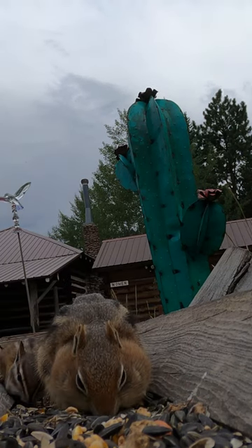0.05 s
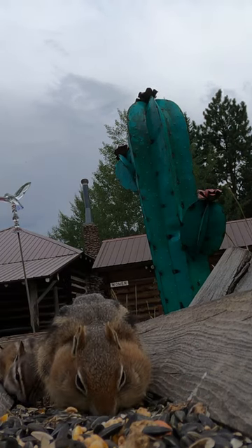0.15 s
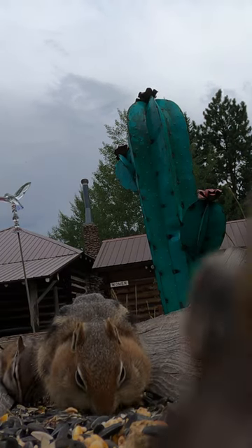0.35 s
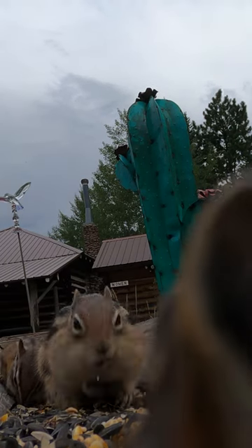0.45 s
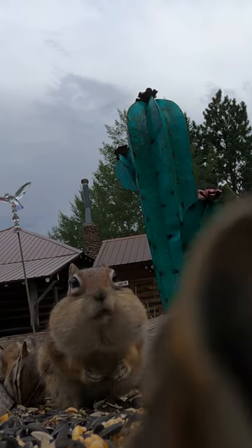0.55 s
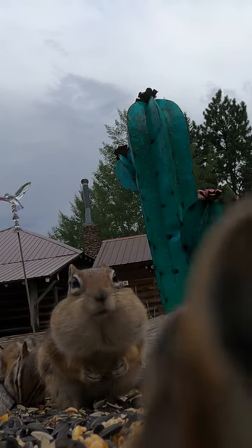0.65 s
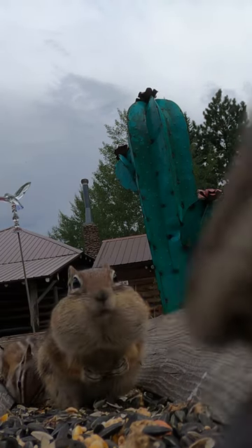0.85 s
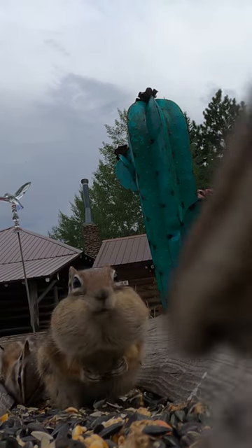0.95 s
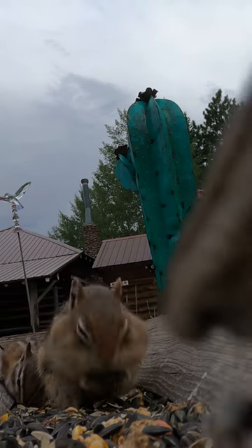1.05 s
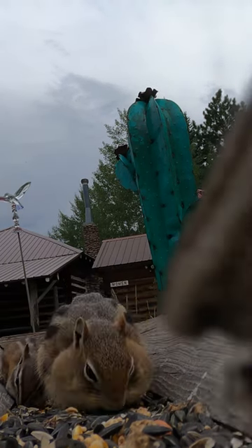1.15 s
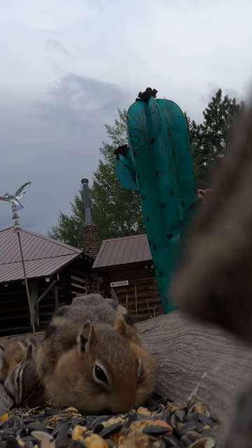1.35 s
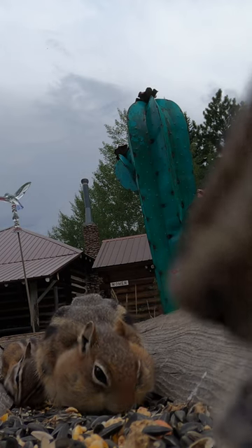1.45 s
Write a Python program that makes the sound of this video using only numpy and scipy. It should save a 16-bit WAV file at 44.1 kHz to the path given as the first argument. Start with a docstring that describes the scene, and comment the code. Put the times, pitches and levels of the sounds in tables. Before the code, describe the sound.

Chipmunks rummage through dry seeds very close, husks clicking and rustling, with soft bumps.

```python
"""Chipmunks in the sunflower seeds

Chipmunks rummage in a seed heap, centimetres from a phone lying outdoors. Husks slide in short
scuffs, snap, ping and ring as they are gnawed. One animal bumps the right microphone port and
brushes past it with its fur. Air rumbles on the ports over a quiet yard."""
import sys
import numpy as np
from scipy import signal
from scipy.fft import rfft, irfft, next_fast_len
from scipy.io import wavfile

SR = 44100
rng = np.random.default_rng(int(sys.argv[2]) if len(sys.argv) > 2 else 0)


def int16_out(signal):
    """Quantize to a 16-bit WAV file."""
    q = np.round(np.clip(np.atleast_2d(signal).T, -1, 1) * 32767)
    wavfile.write(sys.argv[1], SR, q.astype(np.int16))


N = 66150
HUSK_LIKENESS = 0.43  # how alike scuffs and snaps are at the two ports


def undb(db):
    """Decibels to gain."""
    return 10 ** (np.asarray(db) / 20)


def unit(x):
    """Scale to rms 1."""
    return x / np.sqrt(np.mean(x ** 2) + 1e-20)


def shape(x, response):
    """Filter by a response given as a function of frequency."""
    size = next_fast_len(x.shape[-1] + 4096)
    hz = np.fft.rfftfreq(size, 1 / SR) + 1e-3
    return irfft(rfft(x, size) * response(hz), size)[..., :x.shape[-1]]


def colour(x, points):
    """Minimum-phase EQ through (freq_hz, gain_db) points."""
    hz, db = np.array(points).T
    f = np.fft.rfftfreq(4096, 1 / SR) + 1
    gain = undb(np.interp(np.log(f), np.log(hz), db))
    cepstrum = irfft(np.log(gain))
    fold = 1 + np.sign(len(cepstrum) / 2 - np.arange(len(cepstrum)))
    fold[0] = 1
    impulse = irfft(np.exp(rfft(cepstrum * fold)))
    return signal.fftconvolve(x, impulse[None], axes=-1)[:, :N]


def resonate(x, hz, width_hz):
    """A resonance with gain 1 at its centre."""
    return shape(x, lambda f: 1 / (1 + 1j * (f / hz - hz / f) * hz / width_hz))


def noise(likeness, samples=N):
    """Stereo white noise, from unrelated sides (likeness 0) to mono (1)."""
    mid, side = rng.standard_normal((2, samples))
    return np.sqrt((1 + likeness) / 2) * mid + np.sqrt((1 - likeness) / 2) * side * np.array([[1], [-1]])


def pan(db):
    """Constant-power gains, the left db above the right."""
    return unit(undb(np.array([[db], [-db]]) / 2))


def yard():
    """A faint, steady outdoor hush."""
    # EQ of the hush: freq_hz, gain_db
    hush_eq = [(25, 0), (60, -5.5), (112, -13.5), (175, 6.5), (300, -6.5), (700, -15), (1100, -1),
               (1400, -4.5), (1900, -12.5), (2500, -13.5), (4000, -20), (6500, -25), (13000, -38),
               (16000, -50)]
    return unit(colour(noise(likeness=0.39), hush_eq)) * undb(-62.5) * pan(db=-1.5)


def air(t, left_db=-9):
    """Stirred air rumbles on the ports, most on the right."""
    # swells of air on the right port: time_s, level_db
    swells = [(0, -76), (.14, -70), (.19, -48.5), (.222, -38.5), (.335, -53.5), (.365, -43), (.42, -48.5),
              (.465, -44.5), (.5, -52.5), (.635, -54.5), (.69, -45), (.76, -46), (.86, -46.5), (.94, -55),
              (1, -58), (1.1, -68)]
    # EQ of the rumble: freq_hz, gain_db
    rumble_eq = [(15, -1), (35, -0.5), (90, -4), (160, -6), (260, -15.5), (500, -23), (1000, -32.5),
                 (4000, -55.5)]
    rumble = unit(colour(noise(likeness=0.89), rumble_eq))
    return rumble * undb(np.interp(t, *np.array(swells).T)) * undb([[left_db], [0]])


def scuffs(t, contacts_per_s=6000, scatter_db=5):
    """Sliding seeds make showers of tiny, uneven contacts; one short, low burst is the phone's knock."""
    # seed scuffs, plus a short 1.2 kHz knock of the phone's body at the first bump:
    # peak_s, rise_s, fall_s, pre_eq_level_db, centre_hz, pan_db
    bursts = [(.012, 0.031, 0.029, -54.5, 5150, -2), (0.066, 0.0054, 0.0053, -58, 1760, -1),
              (0.168, 0.0033, 0.0071, -34.5, 6440, -6), (0.179, 0.012, 0.019, -40, 3960, 1.5),
              (0.223, 0.0076, 0.0068, -43.5, 5000, -5.5), (0.229, 0.002, 0.0034, -51, 1190, -14),
              (0.338, 0.0018, 0.0091, -54, 1530, 1), (0.412, 0.011, 0.012, -51.5, 6100, 2),
              (0.44, 0.0073, 0.011, -44, 4560, 0), (0.494, 0.0012, 0.0061, -44, 3820, 7),
              (.516, 0.0063, 0.036, -46, 5400, 1.5), (0.539, 0.012, 0.01, -47, 5500, 0),
              (.601, 0.0018, 0.0059, -51.5, 2140, 2), (.653, 0.0038, 0.0042, -34, 5740, -10),
              (0.681, 0.01, 0.013, -42.5, 3320, -13), (0.694, 0.0086, 0.015, -45, 4900, 21),
              (0.726, 0.0047, 0.016, -46.5, 4400, -1), (0.756, 0.0066, 0.028, -38, 4400, -3.5),
              (0.81, 0.0054, 0.011, -38, 5900, 22), (0.835, 0.014, 0.013, -43.5, 4160, 2),
              (.858, 0.018, 0.013, -43, 3500, -6.5), (0.903, 0.0037, 0.015, -51.5, 4460, -1.5),
              (0.932, 0.017, 0.03, -52, 5300, -2), (.977, 0.0074, 0.01, -50.5, 4060, -2.5),
              (1.031, 0.0052, 0.013, -55, 5200, -6), (1.074, 0.0093, 0.022, -51.5, 5000, -7),
              (1.159, 0.0068, 0.0088, -49, 3240, -1.5), (1.194, 0.0051, 0.0068, -54, 3700, 11),
              (1.234, 0.03, 0.018, -57.5, 2870, 0), (1.379, 0.014, 0.0087, -58.5, 1800, 1)]
    out = 0
    for at, rise, fall, db, hz, pan_db in bursts:
        contacts = rng.random(N) < contacts_per_s / SR
        sizes = undb(scatter_db * rng.standard_normal(N))
        swell = np.exp(-(np.minimum(t - at, 0) / rise) ** 2 - np.maximum(t - at, 0) / fall)
        grains = resonate(noise(HUSK_LIKENESS) * contacts * sizes * swell, hz, width_hz=1.37 * hz)
        out = out + unit(grains) * np.sqrt(np.mean(swell ** 2)) * undb(db) * pan(pan_db)
    return out


def snaps(t, crack_s=0.00027, ring_s=0.0013, ring_db=-15, tick_db=7.5):
    """Each husk breaks with a sharp tick, cracks for a fraction of a millisecond and rings briefly."""
    # single husks breaking: start_s, pre_eq_level_db, centre_hz, pan_db
    breaks = [(0.024, -22.5, 8600, -3.5), (0.1676, -25, 6500, 3), (0.1749, -16.5, 7900, -17.5),
              (0.184, -20.5, 5350, -11), (0.4114, -28, 6440, -15), (0.4236, -28, 6260, -34),
              (0.4263, -25, 5900, -31), (0.4366, -34, 4830, -1), (0.4952, -23, 7250, -11),
              (0.6036, -36.5, 6860, -16), (0.6153, -33.5, 6940, 5.5), (0.6522, -15.5, 6060, -1.5),
              (0.665, -20, 6800, -30), (0.6766, -22, 4670, -14), (0.6799, -18.5, 3950, 7),
              (0.6888, -30, 4100, -18), (0.6949, -20.5, 4870, -1), (0.7508, -26.5, 4200, 2),
              (0.7545, -16.5, 4640, -9.5), (0.7718, -24, 3780, 17), (0.8003, -26.5, 3940, -21),
              (0.8084, -29, 5800, -21), (0.8387, -21, 4000, -9.5), (.851, -31, 4020, 11),
              (0.8712, -30, 3040, 0), (1.01, -39.5, 6200, -5), (1.0231, -25.5, 6000, -3.5),
              (1.1503, -34, 5050, -6), (1.1606, -32, 4800, -19), (1.2209, -38, 4270, -10),
              (1.2327, -38, 3920, -22), (1.238, -29, 6260, -19), (1.382, -42.5, 4270, -17)]
    out = np.zeros((2, N + SR))
    age = t[:SR // 50]
    envelope = np.exp(-age / crack_s) + undb(ring_db) * np.exp(-age / ring_s)
    for at, db, hz, pan_db in breaks:
        burst = noise(HUSK_LIKENESS, len(age)) * envelope
        snap = resonate(burst, hz, width_hz=0.46 * hz)
        snap /= np.sqrt(np.sum(snap ** 2, axis=1, keepdims=True) / (crack_s * SR / 2))
        tick = np.array([1, -1]) * np.sin(np.pi * hz / SR)  # higher husks tick harder
        snap[:, :2] += undb(tick_db) * tick
        start = int(at * SR)
        out[:, start:start + len(age)] += snap * undb(db) * pan(pan_db)
    return out[:, :N]


def bumps(t, top_hz=790, left_db=-51):
    """Each soft bump on the right port, and each later paw step, is a pressure swing that slows quickly as it
    dies away."""
    # body nudges on the right port, then from 0.387 s soft paw steps: # start_s, gain_db, start_pitch_hz,
    # attack_s, decay_s, period_growth_s_per_s
    thumps = [(0.2228, -4, 417, 0.0022, 0.0085, 0.93), (0.2285, 2, 570, 0.00068, 0.00081, 0.084),
              (0.2302, 0.5, 1080, 0.0033, 0.0056, 1.615), (0.283, -5, 472, 0.0021, 0.01, 0.874),
              (0.2897, -13, 147, 0.00063, 0.0059, 0.05), (0.2947, -8.5, 99.6, 0.0046, 0.0055, 1.5),
              (0.387, -26, 107, 0.0025, 0.0077, 3.9), (.53, -30.5, 130, .003, 0.0099, 1.3),
              (.589, -35, 130, 0.0022, 0.0084, 0.73)]
    out = 0
    for at, db, hz, attack, decay, slowing in thumps:
        age = np.maximum(t - at, 0)
        cycles = np.log1p(slowing * hz * age) / slowing
        envelope = (1 - np.exp(-(age / attack) ** 2)) * np.exp(-age / decay)
        out = out - undb(db) * np.sin(2 * np.pi * cycles) * envelope
    muffled = shape(out, lambda f: 1 / np.hypot(1, (f / top_hz) ** 10))
    return muffled * undb([[left_db], [0]])


def pings(t, pitch_hz=7070, decay_s=0.0012):
    """A struck hard shell rings at one high pitch for a few milliseconds."""
    # strikes on hard shells: start_s, level_db, pan_db
    strikes = [(0.656, -33, -8), (0.6656, -30, -13), (0.694, -33.5, 3), (0.8085, -33.5, 4),
               (0.8285, -37, 7)]
    out = 0
    for at, db, pan_db in strikes:
        age = np.maximum(t - at, 0)
        ring = np.sin(2 * np.pi * pitch_hz * age) * np.exp(-age / decay_s)
        out = out + ring * undb(db) * pan(pan_db)
    return out


def brush(t, peak_s=0.846, rise_s=0.062, fall_s=0.035, level_db=-36.5, left_db=-20):
    """Fur drags across the right port and lifts off."""
    # EQ of the fur's rub: freq_hz, gain_db
    fur_eq = [(20, -15), (85, 6), (180, -5), (400, -7.5), (800, -14.5), (1300, -15), (3000, -34),
              (8000, -51), (16000, -57)]
    contact = np.exp(-((t - peak_s) / np.where(t < peak_s, rise_s, fall_s)) ** 2)
    rub = unit(colour(noise(likeness=0), fur_eq))
    return rub * contact * undb(level_db) * undb([[left_db], [0]])


def gnaws(t, slips_per_s=6000, top_hz=10400):
    """Teeth catch and slip on a hollow shell: a quick, ragged run of ticks that keeps it ringing."""
    # resonances of the hollow shell: centre_hz, width_hz, gain_db
    shell_modes = [(1570, 760, -2), (2660, 690, -1), (3370, 990, -0.5), (5630, 1800, 1), (6700, 360, -6)]
    # bites on the shell: middle_s, length_s, level_db, centre_hz, pan_db
    bites = [(0.7684, 0.0089, -34.5, 4450, 2), (1.074, 0.014, -52, 2480, -4), (1.233, .018, -52, 2500, -3),
             (1.306, 0.0095, -53, 2120, -4.5), (1.326, 0.013, -52, 2470, -5.5),
             (1.474, 0.0091, -56, 2560, -3)]
    ticks = noise(likeness=0.71) * (rng.random(N) < slips_per_s / SR)
    ring = sum(undb(db) * resonate(ticks, hz, width) for hz, width, db in shell_modes)
    ring = shape(ring, lambda f: 1 / np.hypot(1, (f / top_hz) ** 2))
    out = 0
    for at, length, db, hz, pan_db in bites:
        bite = np.exp(-(2 * (t - at) / length) ** 4)
        rasp = resonate(ring, hz, width_hz=hz) * bite
        out = out + unit(rasp) * np.sqrt(np.mean(bite ** 2)) * undb(db) * pan(pan_db)
    return out


def seed_heap(t, tail_t60_s=0.13, tail_db=-18, left_lag_s=0.00007, left_top_hz=9100):
    """Snaps and scuffs ring in the husks and, with the gnawing, scatter off a log."""
    # EQ of the heap: freq_hz, gain_db
    heap_eq = [(150, 19.5), (400, 14.5), (700, 4.5), (1200, 11.5), (1900, 2), (3000, -0.5), (5500, -3),
               (9500, -4.5), (12000, -10.5), (16000, -21)]
    # resonances of the husks: centre_hz, width_hz, gain_db
    husk_modes = [(2970, 870, -13), (3470, 120, -9.5), (6300, 690, -18), (7060, 240, -15)]
    rustle = colour(snaps(t) + scuffs(t), heap_eq)
    ring = sum(undb(db) * resonate(rustle, hz, width) for hz, width, db in husk_modes)
    direct = undb(-2) * (rustle + ring) + gnaws(t)
    scatter = rng.standard_normal((2, N)) * undb(-60 * t / tail_t60_s)
    tail = signal.fftconvolve(direct, unit(scatter) / np.sqrt(N), axes=-1)[:, :N]
    left, right = direct + undb(tail_db) * tail
    # the left port hears the heap later and duller
    left = shape(left, lambda f: np.exp(-2j * np.pi * f * left_lag_s) / np.hypot(1, (f / left_top_hz) ** 2))
    return np.array([left, right])


def scene():
    """All sources at the two ports."""
    t = np.arange(N) / SR
    return seed_heap(t) + pings(t) + bumps(t) + air(t) + brush(t) + yard()


def record(dry):
    """The phone cuts the highest treble steeply."""
    top_hz = 16300
    return signal.sosfilt(signal.ellip(10, .2, 80, top_hz, fs=SR, output="sos"), dry)


dry = scene()
out = record(dry)
int16_out(out)
```